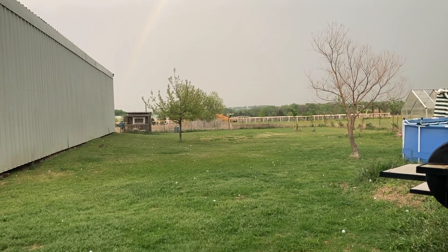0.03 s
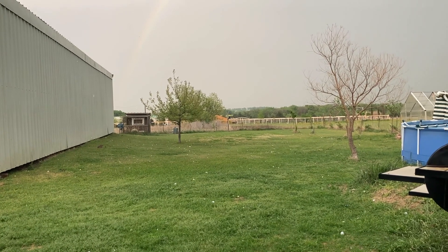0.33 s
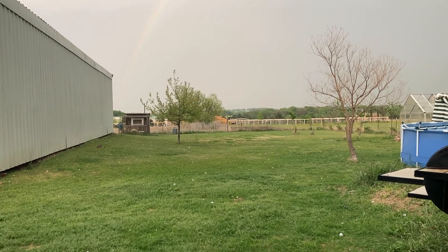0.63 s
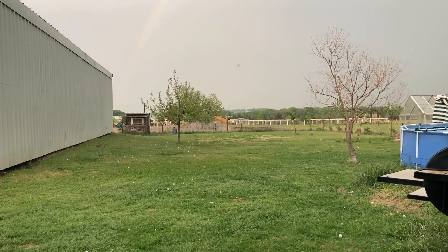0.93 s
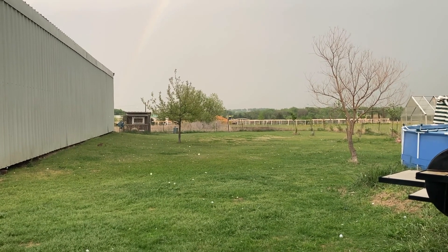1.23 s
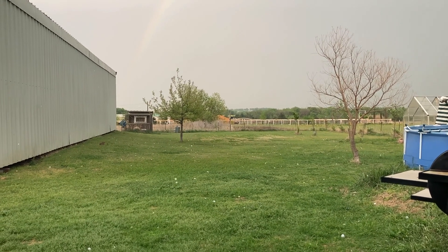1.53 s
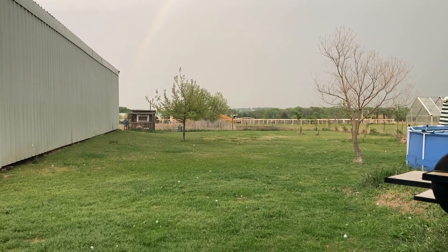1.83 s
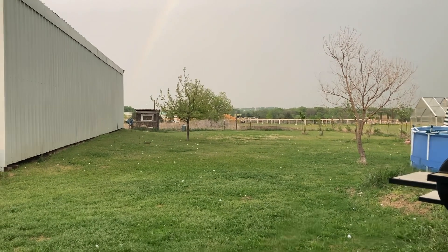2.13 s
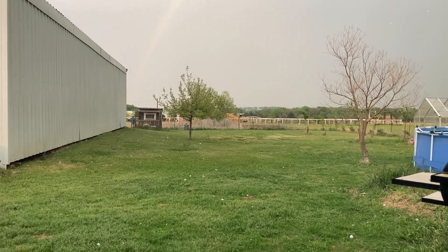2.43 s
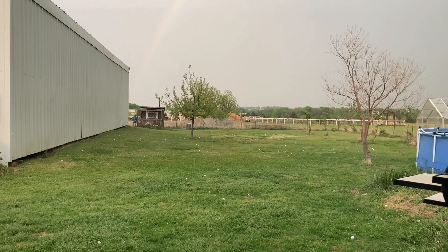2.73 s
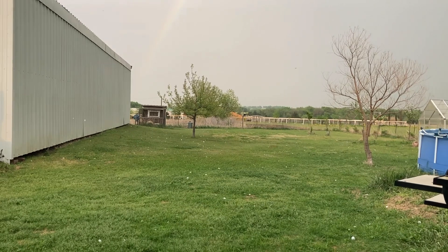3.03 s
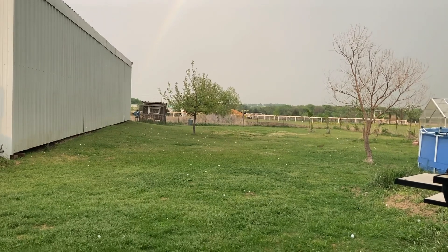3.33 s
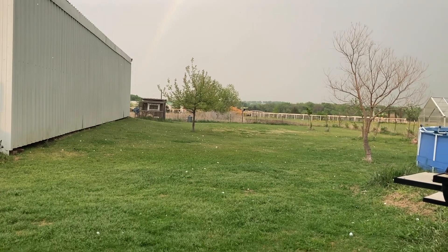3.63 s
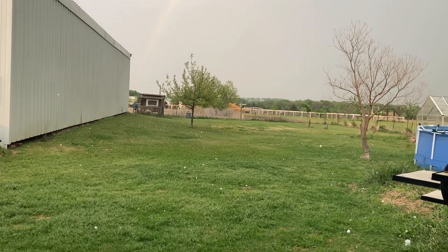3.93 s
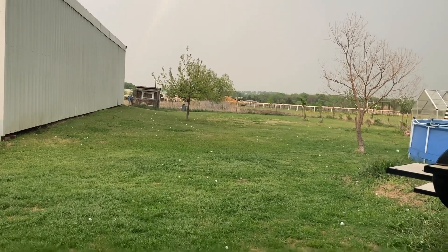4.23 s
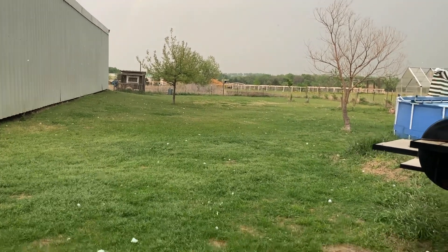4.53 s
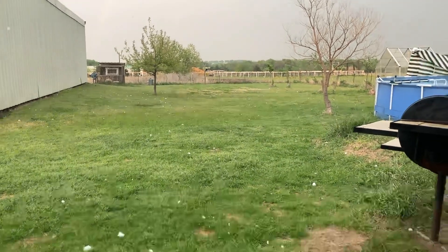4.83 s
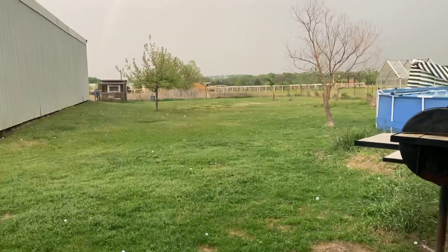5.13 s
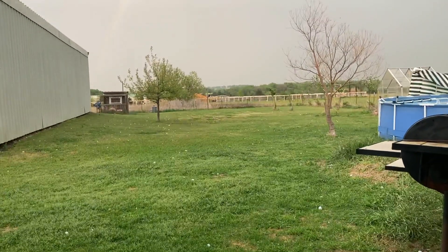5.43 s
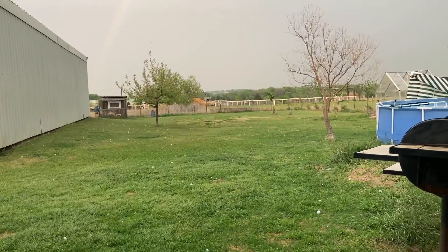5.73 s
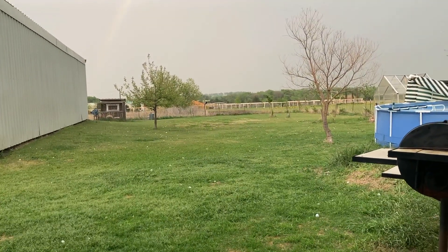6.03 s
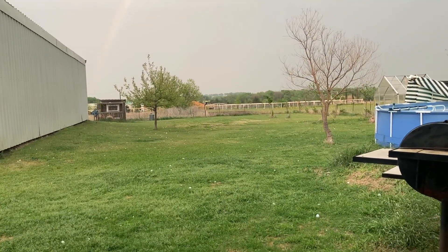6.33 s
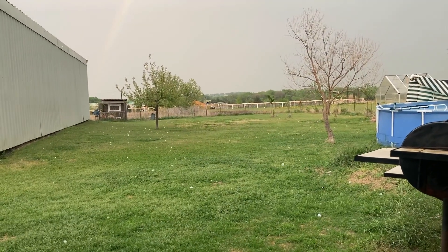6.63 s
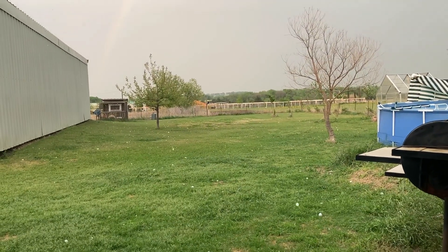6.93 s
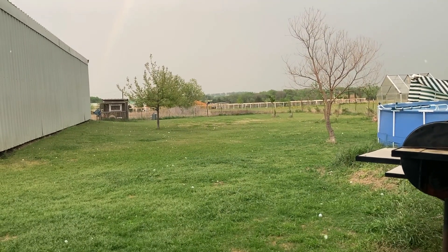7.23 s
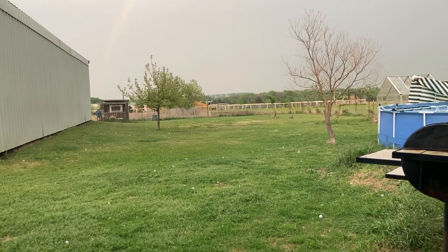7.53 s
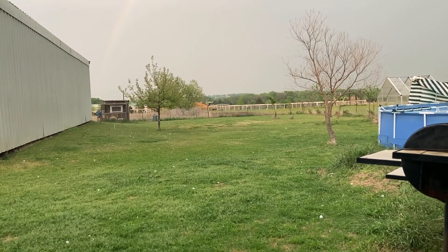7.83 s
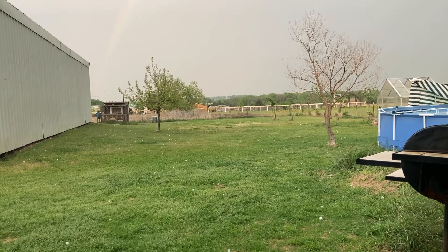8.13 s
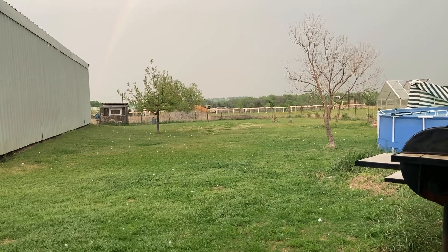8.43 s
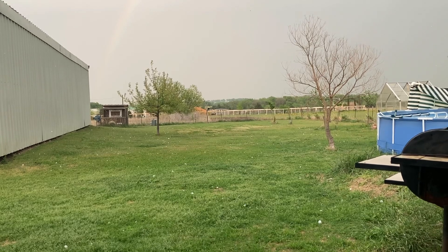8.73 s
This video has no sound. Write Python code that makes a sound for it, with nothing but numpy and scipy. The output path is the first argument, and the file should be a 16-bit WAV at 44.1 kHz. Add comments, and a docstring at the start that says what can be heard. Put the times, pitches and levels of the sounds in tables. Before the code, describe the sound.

Scattered hailstones strike a sheet-metal roof above a sheltered spot in a yard. Each lands with a sharp crack and a ringing bonk, and the clatter fades through the panels into a low hum. The hits come in irregular clusters, thin out in the second half, then two hard ones land near the end. Light rain and ticking ice fill the gaps, and a little wind rumbles on the microphone.

```python
"""Scattered hailstones bang on a sheet-metal roof above a sheltered spot in a yard.
Each stone cracks, the struck spot rings, and the clatter spreads through the panels and dies away,
treble first; the roof's resonances hum on between blows. Small pellets, ticking ice grains and
light rain fill the gaps, and a little wind rumbles on a two-port microphone."""
import sys
import numpy as np
from scipy import signal
from scipy.fft import rfft, irfft
from scipy.io import wavfile

SR = 44100
rng = np.random.default_rng(int(sys.argv[2]) if len(sys.argv) > 2 else 0)


def dump_mix(stems):
    """Bounce the given channels to the path in sys.argv[1] as a 16-bit WAV at rate SR."""
    frames = np.atleast_2d(stems).T  # one column per channel
    limited = np.clip(frames, -1, 1)  # hard clip at full scale
    pcm = np.round(limited * 32767).astype(np.int16)
    wavfile.write(sys.argv[1], SR, pcm)


N = 388080
CONTACT_S, CONTACT_HZ = 0.0038, 3000  # attack time, and the frequency at which it holds

# Each row: start in seconds, level in dB, brightness in dB, crack in dB, spreading time in seconds,
# body in dB, bonk pitch in Hz, bonk in dB, clack pitch in Hz, clack in dB.
HAILSTONES = [(.076, -11.5, -0.5, 16, 0.0054, 1.5, 530, 5, 2195, -1),
              (.24, -16, 6.5, 16, .072, 0.5, 680, 8, 1450, 12), (.328, -8, 2, 4, 0.21, 2, 485, 8, 1992, -8),
              (.505, -9.5, -3, 14, 0.0074, -1, 526, 14.5, 1950, 8),
              (.576, -11.5, -6.5, 17, 0.015, -2.5, 670, 7, 1760, 10),
              (.766, -12.5, 0.5, 1, 0.6, -3.5, 674, 12, 2000, -8),
              (.959, -16.5, 5.5, 14, 0.049, 4, 432, 10, 1670, 9),
              (1.188, -15, 5.5, 12, 0.015, -4.5, 336, 5, 3730, 14),
              (1.283, -13, 2, 15, 0.0055, 2, 570, -4, 1870, 3),
              (1.33, -12, -2.5, -18, .46, 1.5, 910, 15, 1992, 10),
              (1.412, -16, 1.5, -4, 0.029, -7, 644, 13, 2380, 14),
              (1.833, -13.5, -5, 1, 0.022, -8.5, 694, 3.5, 1700, -9),
              (1.916, -13.5, 2.5, -4, 0.086, -0.5, 643, 11, 2160, 7),
              (2.012, -11, 2, 14, 0.07, 0.5, 468, 14.5, 1850, 3),
              (2.163, -31.5, 7, 21.5, 0.0045, 5, 470, 13, 1360, 17),
              (2.461, -25, -23, 23.5, 0.007, -5, 787, 9, 2070, 4),
              (2.534, -20, 1, -13, 0.18, 3, 648, 4, 2020, -7),
              (2.596, -13, 2, 15.5, 0.01, 3.5, 570, 12.5, 1300, 5),
              (2.723, -12.5, 4, 17.5, 0.01, 0, 494, -6, 1460, 9),
              (2.758, -21.5, -1, 12, .009, -3, 545, 10, 1980, 4),
              (2.824, -21.5, 3.5, 20.5, .011, 6.5, 1176, 3, 1938, 3),
              (2.938, -11.5, 0, 8.5, 0.091, 2, 770, 14.5, 1700, 4),
              (3.06, -26, 7, 15, 0.051, -5, 795, 4, 1557, 12),
              (3.188, -24.5, -16, 4, 0.0047, -3, 790, 11, 1506, 11),
              (3.317, -19.5, -9, 2, 0.12, -3, 541, 4, 1820, -9),
              (3.526, -14, 2, 15, 0.0086, -2, 645, -3, 1783, -3),
              (3.711, -8, -1, 11, 0.02, 1, 560, 6, 1540, 7.5),
              (3.877, -21, -2, -8, 0.25, 3, 685, 3, 1783, 5),
              (3.956, -8.5, -8, 24.5, .025, -1, 560, 10.5, 1540, 10),
              (4.159, -20.5, -5, 15.5, 0.11, 4.5, 572, 8, 3420, 4),
              (4.26, -17.5, -10, 17.5, .051, -3, 660, 10, 1520, 2),
              (4.326, -24.5, -5.5, 16, 0.0056, -10, 660, 1, 1370, 14),
              (4.375, -22, -2.5, 2, 0.37, -3, 666, 6, 5113, 6),
              (4.716, -19, 1, -9, 0.015, -3.5, 1261, -6, 1574, 0),
              (4.87, -11, 0.5, 5, 0.039, -2, 695, 7, 1520, 10.5),
              (5.027, -11, 6.5, -16, 0.15, -2.5, 514, -4, 2600, 9),
              (5.463, -27, 5, 10, .17, 5, 564, 11, 1826, -3),
              (5.52, -11.5, -2, -20, 0.043, -7.5, 331, 5, 2130, 8),
              (5.656, -19, 4.5, 10, .014, 0, 478, 1, 4330, 6),
              (5.92, -31.5, 0, -8, 0.01, -3, 475, 5, 2570, 13),
              (5.968, -31.5, 6.5, 0, .0086, -10, 648, 13, 1574, 15),
              (6.022, -26.5, 9, 13, 0.0062, 2, 536, 7, 1870, 13),
              (6.287, -31, 3, -12, .016, -9, 352, -2, 3984, 14),
              (6.323, -25, 1.5, 13, 0.13, -5, 734, 10, 1965, 1),
              (6.585, -30, 2, -1, 0.0081, -4, 471, 0, 2896, 13),
              (6.794, -10, -2.5, 12, 0.0021, -1.5, 435, 1, 1510, 6),
              (6.984, -8.5, .5, 17.5, 0.02, -1.5, 564, -8, 1540, -6),
              (7.211, -17.5, -2, 14, 0.035, -6.5, 584, 9, 1620, 8),
              (7.342, -23.5, 1, 4, 0.015, -8, 335, 11, 1734, 4),
              (7.458, -27, 7.5, 7, 0.0072, 1.5, 867, 0, 5150, 14),
              (7.714, -28, 10.5, -9, 0.54, -8, 666, -7, 1808, -2),
              (8.135, -23, 1.5, -26, 0.07, -3, 670, 11, 4000, -3),
              (8.257, -48.5, 21, 6, 0.0025, -3, 875, 13, 1618, 11),
              (8.437, -6.5, -2, 14, 0.02, -7.5, 400, -1, 1327, 2),
              (8.529, -10.5, -9, 11, 0.097, 1.5, 335, 8, 1520, 2)]
# Clatter spectrum. Each row: frequency in Hz, density in dB per Hz.
ROOF_SPECTRUM = [(40, -59), (100, -50.5), (150, -45), (220, -46), (320, -40.5), (560, -40), (900, -40.5),
                 (1500, -39.5), (2800, -41.5), (4400, -43), (6400, -48), (9000, -53), (12500, -53.5),
                 (15500, -64.5)]
# Panel decay. Each row: band centre in Hz, t60 in seconds, crack share in dB, after-ring share in dB.
ROOF_BANDS = [(162, 0.66, -34, -0.5), (373, 0.43, -11, -6.5), (503, 0.81, -22, -15.5),
              (1395, 0.51, -8, -26), (2550, 0.33, -18.5, -13.5), (3550, 0.34, -33, -34),
              (5700, 0.28, -16.5, -22), (12240, 0.26, -11, -23)]


def roof_clatter(stones, panel_s=0.1, after_ring_ratio=2.86, shatter_db=-1.5, splinter_db=4, uneven_db=3):
    """Each stone excites dense panel modes: a crack, a swell as the waves spread, then a decay."""
    size = 49152
    t, hz = np.arange(size) / SR, np.fft.rfftfreq(size, 1 / SR)
    centre_hz, t60_s, crack_share_db, after_db = np.array(ROOF_BANDS).T[:, :, None]
    octave, band_octaves = np.log2(hz + 1), np.log2(centre_hz[:, 0])
    band_split = np.sqrt([np.interp(octave, band_octaves, band) for band in np.eye(len(ROOF_BANDS))])
    # The struck panel dies quickly; the rest of the roof rings on.
    panel = from_db(-60 * t / t60_s) ** 2
    after_ring = from_db(after_db - 60 * t / (t60_s * after_ring_ratio)) ** 2
    decay = (panel + after_ring) * np.minimum(1, 10 * (1 - t / t[-1]))
    roof_db = curve(ROOF_SPECTRUM, hz)
    out = np.zeros((2, N))
    for start_s, db, bright_db, crack_db, spread_s, body_db in stones[:, :6]:
        colour_db = roof_db + curve([(300, thud_db(spread_s)), (1500, 0), (6000, bright_db)], hz)
        colour_db += curve([(120, 0), (250, body_db), (850, body_db), (1400, 0)], hz)
        # Every spot favours its own resonances.
        colour_db += uneven_db * np.interp(hz, np.linspace(0, SR / 2, 700), rng.standard_normal(700))
        modes = irfft(noise_spectra(db + colour_db, size)[:, None] * band_split)
        # A slower swell is raised to keep its energy.
        swell = (1 - np.exp(-t / max(spread_s, 1 / SR))) * (1 + spread_s / panel_s)
        # Heavier stones take longer to break up.
        crack_peak_s = 0.003 * 2 ** ((db + 7) / 24.5)
        crack = (pulse(t / crack_peak_s) * from_db(crack_db + shatter_db * drift(size, 670))) ** 2
        crack += splinters(t) * from_db(splinter_db) ** 2
        envelope = np.sqrt(decay * swell + from_db(crack_share_db) ** 2 * crack)
        attack = wave_arrivals(centre_hz)
        envelope[:, :attack.shape[1]] *= attack
        add(out, start_s, (modes * envelope).sum(1))
    return out


def thud_db(spread_s, typical_db=-5.5, db_per_doubling=0.52, typical_s=0.053):
    """Bass of a stone: the farther off it lands, the longer it spreads and the more bass arrives."""
    return typical_db + db_per_doubling * np.log2(np.maximum(spread_s, 1 / SR) / typical_s)


def splinters(t, count=4, within_s=0.03, snap_s=0.0011):
    """Power of the snaps as pieces of a stone strike again, the later ones weaker."""
    when, weight = rng.random((2, count, 1))
    snaps = pulse((t - within_s * when) / snap_s) * (0.5 + weight) * (1 - when / 2)
    return (snaps ** 2).sum(0)


def wave_arrivals(centre_hz, stagger=0.45, lumpy_db=2.5, lumps_hz=330, settle_s=0.025):
    """Attack per band: low bending waves come later, in uneven lumps that soon blend."""
    t = np.arange(6144) / SR
    rise_s = CONTACT_S * np.sqrt(CONTACT_HZ / np.maximum(centre_hz, CONTACT_HZ / 4))
    rise_s *= np.exp(stagger * rng.standard_normal(centre_hz.shape))
    lumps = np.array([drift(len(t), lumps_hz) for _ in centre_hz])
    return (1 - np.exp(-t / rise_s)) * from_db(lumpy_db * lumps * np.exp(-t / settle_s))


def clacks(stones, gain_db=0.5, width_oct=0.08, rise_share=0.07, decay_s=0.035):
    """The struck spot rings with a low bonk and a high clack; distant ones rise more slowly."""
    size = 12288
    t, octave = np.arange(size) / SR, np.log2(np.fft.rfftfreq(size, 1 / SR) + 1)
    out = np.zeros((2, N))
    for start_s, db, _, _, spread_s, _, bonk_hz, bonk_db, clack_hz, clack_db in stones:
        envelope = (1 - np.exp(-t / (CONTACT_S + rise_share * spread_s))) * np.exp(-t / decay_s)
        peaks = sum(from_db(ring_db + curve(ROOF_SPECTRUM, hz)) * peak(octave, np.log2(hz), width_oct)
                    for hz, ring_db in [(bonk_hz, bonk_db), (clack_hz, clack_db)])
        add(out, start_s, irfft(noise_spectra(db + gain_db, size) * peaks) * envelope)
    return out


def frame_scrapes(stones, lead_s=0.01, gain_db=-17, centre_hz=3000):
    """The roof's frame carries a faint scrape of each blow ahead of the airborne sound."""
    size = 2048
    age, hz = np.arange(size) / SR / lead_s, np.fft.rfftfreq(size, 1 / SR)
    colour_db = curve(ROOF_SPECTRUM, hz) - 3 * np.log2((hz + 1) / centre_hz) ** 2
    envelope = age * np.exp((1 - age ** 2) / 2)
    out = np.zeros((2, N))
    for start_s, db in stones[:, :2]:
        add(out, start_s - lead_s, irfft(noise_spectra(db + gain_db + colour_db, size)) * envelope)
    return out


# Close hits. Each row: start in seconds, level in dB, pitch in Hz, width in octaves, rise in seconds.
CLOSE_HITS = [(0.083, -8, 2210, 0.12, 0.0018), (0.331, -19.5, 190, 0.7, 0.01),
              (0.512, -24, 182, 0.17, 0.016), (0.509, -15, 530, 0.037, 0.003),
              (0.5759, -3, 1740, 0.42, 0.00037), (0.5765, -26, 6500, 1, 0.00084),
              (0.958, -20, 4830, 0.13, 0.003), (0.9582, -17, 9500, 0.65, 0.0038),
              (1.188, -14.5, 4100, 0.21, 0.011), (1.419, -15.5, 2560, 0.71, 0.002),
              (1.519, -30, 6570, 0.96, 0.0013), (1.682, -33, 6870, 0.93, 0.00075),
              (2.02, -27, 219, 0.71, 0.013), (2.025, -17, 168, 0.032, 0.037),
              (2.602, -14, 4000, 0.8, 0.0083), (2.604, -25, 1690, 0.065, 0.012),
              (2.732, -14.5, 1360, 0.36, 0.0088), (2.758, -17, 1730, 0.84, 0.0038),
              (2.751, -30.5, 140, 0.19, 0.025), (2.4608, -32.5, 3180, 0.54, 0.0012),
              (2.8255, -14, 3750, 0.18, 0.0013), (3.1895, -28, 3260, 0.64, .0008),
              (3.3165, -32, 2970, 0.41, 0.0011), (3.955, -15, 1580, 0.12, 0.0041),
              (3.958, -19, 239, 0.81, 0.0086), (4.374, -31, 5500, 0.67, .0012),
              (6.222, -36, 148, 0.14, 0.023), (6.257, -39, 8500, 0.58, 0.00058),
              (6.478, -36, 4000, 0.76, 0.003), (6.795, -16, 1430, 0.056, 0.004),
              (7.342, -23, 2040, 0.063, 0.0019), (7.347, -25, 6400, 0.32, 0.00072),
              (7.462, -29, 5040, 0.069, .004), (7.612, -39, 7560, 1, 0.0015), (7.86, -41, 770, .25, 0.023),
              (7.907, -35, 6500, 0.73, 0.0011), (8.044, -43, 9100, .6, .0007),
              (8.059, -41, 8000, .6, .0015), (8.257, -34.5, 11000, 0.35, .004),
              (8.44, -13, 1900, 0.75, 0.0039), (8.535, -20, 1180, .4, 0.016)]


def knocks(hits):
    """Ice on nearby hard edges and panels: thuds, knocks, pings and ticks with no tail."""
    size = 6144
    t, octave = np.arange(size) / SR, np.log2(np.fft.rfftfreq(size, 1 / SR) + 1)
    out = np.zeros((2, N))
    for start_s, db, hz, width_oct, rise_s in hits:
        envelope = pulse(t / rise_s)
        ring = irfft(noise_spectra(0, size) * peak(octave, np.log2(hz), width_oct)) * envelope
        add(out, start_s, from_db(db) * ring * envelope.std() / ring.std())
    return out


# Whole-roof resonances. Each row: centre in Hz, width in Hz, density in dB per Hz, t60 in seconds.
ROOF_MODES = [(134.4, 4.4, -44.5, 4), (156, 10.3, -40, 4), (172, 6.7, -47, 4.1), (564, 11, -31.5, 0.23),
              (1460, 25, -62, 1)]


def roof_hum(stones, rise_samples=400):
    """The blows pump the roof's resonances, which hum on between them."""
    hz, out = np.fft.rfftfreq(N, 1 / SR), np.zeros((2, N))
    start_s, db, _, _, spread_s, body_db = stones[:, :6].T
    onsets = np.clip(start_s * SR, 0, N - 1).astype(int)
    blows = np.bincount(onsets, from_db(db + body_db + thud_db(spread_s)) ** 2, N)
    for centre_hz, width_hz, mode_db, t60_s in ROOF_MODES:
        energy = signal.lfilter([1], [1, -np.exp(-2 * np.log(1000) / (t60_s * SR))], blows)
        energy = signal.lfilter([1 / rise_samples], [1, 1 / rise_samples - 1], energy)
        out += irfft(noise_spectra(mode_db, N) * peak(hz, centre_hz, width_hz)) * np.sqrt(energy)
    return out


def pellets(count=20, mean_db=-47, bright_db=8, crack_db=5, spread_s=0.0059, ring_db=3):
    """Small stones falling at random; rows as in HAILSTONES."""
    when, bonk, clack = rng.random((count, 3)).T
    weight, bright, crack = rng.standard_normal((count, 3)).T
    return np.column_stack(np.broadcast_arrays(
        when * N / SR, mean_db + 1.5 * weight, bright_db + 2 * bright, crack_db + 3 * crack,
        spread_s, 0, 400 * 2 ** bonk, ring_db, 1300 * 4 ** clack, ring_db))


def ice_ticks(count=14, mean_db=-51, spread_db=2.5, lowest_hz=4200, width_oct=0.5, rise_s=0.0008):
    """Ice grains ticking on the ground nearby; rows as in CLOSE_HITS."""
    when, pitch, weight = rng.random((count, 3)).T
    db, hz = mean_db + spread_db * (2 * weight - 1), lowest_hz * (1 + 2 * pitch)
    return np.column_stack(np.broadcast_arrays(when * N / SR, db, hz, width_oct, rise_s))


# Light rain. Each row: frequency in Hz, density in dB per Hz.
RAIN_SPECTRUM = [(30, -101), (120, -76), (200, -73.5), (500, -74.5), (1200, -74), (2400, -79.5),
                 (4000, -81), (6500, -88), (10000, -91), (15500, -105)]


def rain(swell_db=2.2, drops_per_s=40, drop_db=-15, drop_spread_db=2.8, drop_s=0.002):
    """A soft wash from the yard, with single drops ticking nearby."""
    colour_db = curve(RAIN_SPECTRUM, np.fft.rfftfreq(N, 1 / SR))
    wash = irfft(noise_spectra(colour_db, N)) * from_db(swell_db * drift(N, 11))
    falls = rng.random(N) < drops_per_s / SR
    drop_power = from_db(drop_spread_db * np.minimum(rng.exponential(1, N), 4)) ** 2
    splash = signal.lfilter([1], [1, -np.exp(-2 / (drop_s * SR))], falls * drop_power)
    return wash + irfft(noise_spectra(colour_db + drop_db, N)) * np.sqrt(splash / splash.mean())


# Wind rumble. Each row: frequency in Hz, relative density in dB.
WIND_SPECTRUM = [(15, -30), (30, -38), (45, 3.5), (65, 5), (85, 4.5), (110, -3), (180, -16), (400, -21),
                 (1500, -70)]
# Short gusts. Each row: peak time in seconds, level in dB.
WIND_GUSTS = [(0.441, -41), (3.22, -43), (3.96, -47), (4.5, -42.5), (4.82, -41), (5.7, -52), (6.98, -40),
              (7.2, -40), (7.659, -45), (8.39, -43.5), (8.52, -34), (8.741, -31)]


def wind(breeze_db=-53, wobble_db=3.5, gust_s=0.088):
    """Air rumbles on the microphone: a wavering breeze, and gusts that swell and ebb alike."""
    t = np.arange(N) / SR
    rumble = irfft(noise_spectra(curve(WIND_SPECTRUM, np.fft.rfftfreq(N, 1 / SR)), N))
    power = from_db(breeze_db + wobble_db * drift(N, 2.5)) ** 2
    for peak_s, db in WIND_GUSTS:
        power += from_db(db) ** 2 * np.exp(-((t - peak_s) / gust_s) ** 2)
    return rumble / rumble.std() * np.sqrt(power)


# Port pair. Each row: frequency in Hz, coherence, left phase lead in radians, left minus right in dB.
PORT_RESPONSE = [(60, .9, 0, .2), (180, .9, .1, 1.2), (380, .7, .1, 2.2), (620, .25, 0, 1),
                 (1300, .06, 0, 0), (3000, .08, 0, -1.2), (6200, .1, 0, -1.3), (7100, .65, -.1, -.5),
                 (8100, .6, -1.4, -.3), (8650, .9, -2.6, 0), (9100, .99, -3.14, 0), (9500, .9, -3.65, 0),
                 (10200, .65, -4.9, 0), (11400, .98, -6.28, 0), (12000, .78, -6.6, 0),
                 (12500, .45, -7.8, 0), (13050, .9, -8.9, 0), (13600, .99, -9.42, 0), (14100, .85, -9.6, 0),
                 (14650, .4, -11, 0), (15200, .7, -12.2, 0), (15700, .97, -12.57, 0)]


def microphone_ports(sound):
    """The two ports hear the bass alike and the middle apart; in the treble one lags the other."""
    hz = np.fft.rfftfreq(N, 1 / SR)
    coherence, lead_rad, balance_db = (curve(PORT_RESPONSE, hz, column) for column in (1, 2, 3))
    left, unrelated = rfft(sound)
    right = (coherence * left + np.sqrt(1 - coherence ** 2) * unrelated) * np.exp(-1j * lead_rad)
    lean = from_db(balance_db / 2)
    return irfft(np.array([left * lean, right / lean]))


# Stereo balance. Each row: time in seconds, left minus right in dB.
TURN_BALANCE = [(0, 0.1), (1.5, 0.1), (2.4, 0.1), (2.8, 0.5), (3.5, 0), (4.3, 0), (5.2, -0.1), (6.7, -0.4),
                (8.1, 0), (8.8, 0)]


def microphone_turn(sound):
    """The microphone turns a little, shifting the balance."""
    lean = from_db(np.interp(np.arange(N) / SR, *np.transpose(TURN_BALANCE)) / 2)
    return sound * np.array([lean, 1 / lean])


def from_db(db):
    """Decibels to gain."""
    return 10 ** (np.asarray(db) / 20)


def curve(points, hz, column=1):
    """One table column, interpolated over log frequency."""
    table = np.array(points, float)
    return np.interp(np.log(hz + 1), np.log(table[:, 0] + 1), table[:, column])


def peak(x, centre, width):
    """Resonance curve: 1 at the centre, half at one width off."""
    return 1 / (1 + ((x - centre) / width) ** 2)


def pulse(age):
    """Rise and decay, peaking at 1 when age is 1."""
    age = np.clip(age, 0, 20)
    return age * np.exp(1 - age)


def noise_spectra(db, size):
    """Spectra of two unrelated noises at the given dB per Hz."""
    return rfft(rng.standard_normal((2, size))) * from_db(db) * np.sqrt(SR / 2)


def drift(size, rate_hz):
    """Random wobble of about unit size, rate_hz steps a second."""
    return np.interp(np.arange(size) * rate_hz / SR, np.arange(4096), rng.standard_normal(4096))


def add(mix, start_s, sound):
    """Mixes a stereo sound in at start_s."""
    part = mix[:, max(round(start_s * SR), 0):][:, :sound.shape[1]]
    part += sound[:, :part.shape[1]]


def scene():
    """Hail on the roof over rain and wind."""
    stones = np.vstack([HAILSTONES, pellets()])
    hail = frame_scrapes(stones) + roof_clatter(stones) + clacks(stones)
    hail += knocks(np.vstack([CLOSE_HITS, ice_ticks()])) + roof_hum(stones)
    return microphone_turn(microphone_ports(hail + rain() + wind()))


def record(dry, cutoff_hz=16000):
    """Soft clipping of the loudest cracks, then a low-pass."""
    low_pass = signal.firwin(511, cutoff_hz, window=("kaiser", 9), fs=SR)
    return signal.oaconvolve(np.tanh(dry), low_pass[None], "same")


dry = scene()
out = record(dry)
dump_mix(out)
```